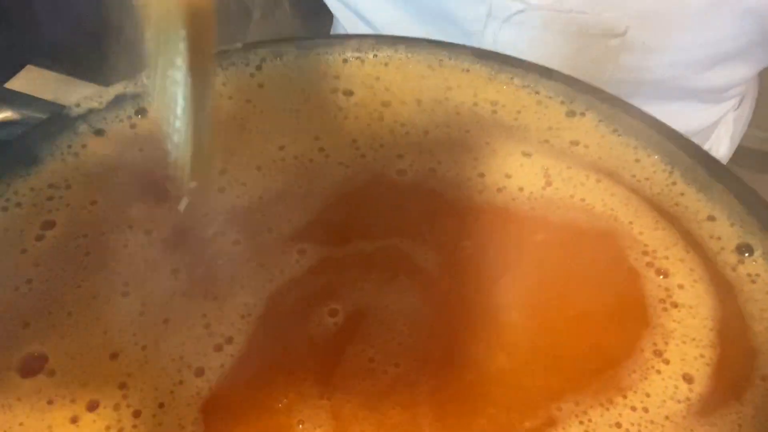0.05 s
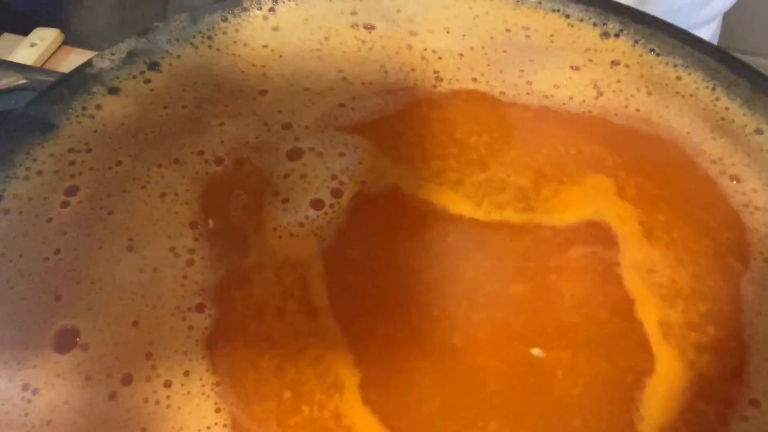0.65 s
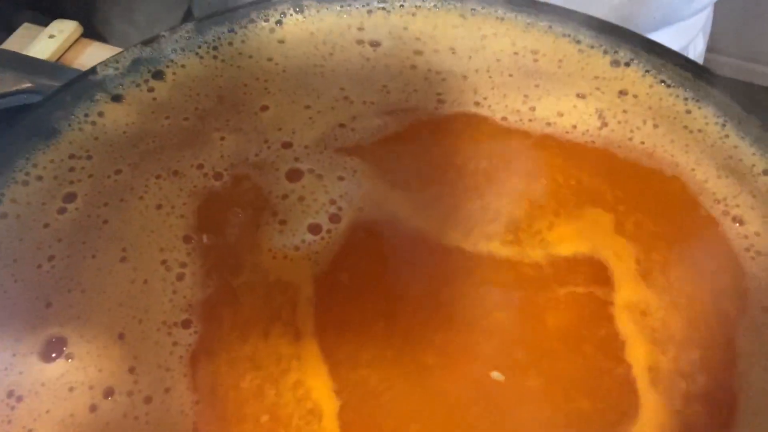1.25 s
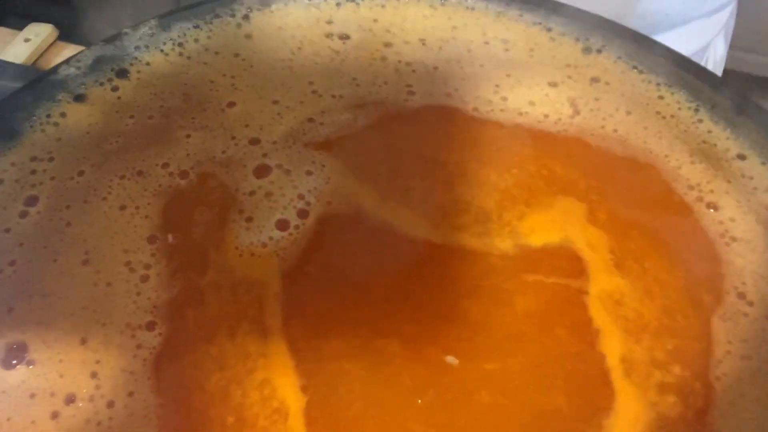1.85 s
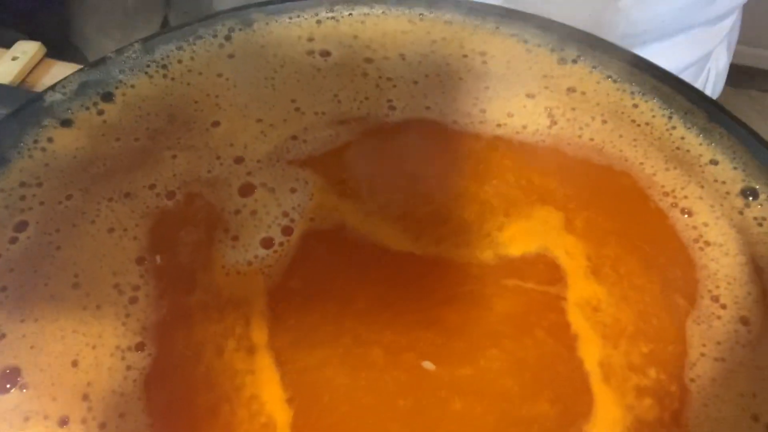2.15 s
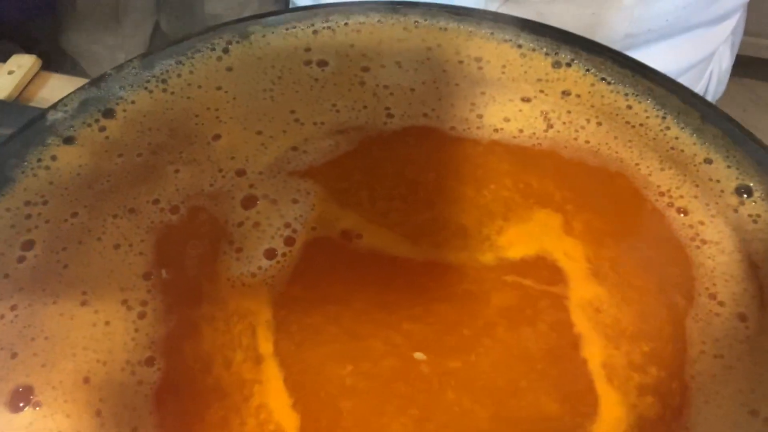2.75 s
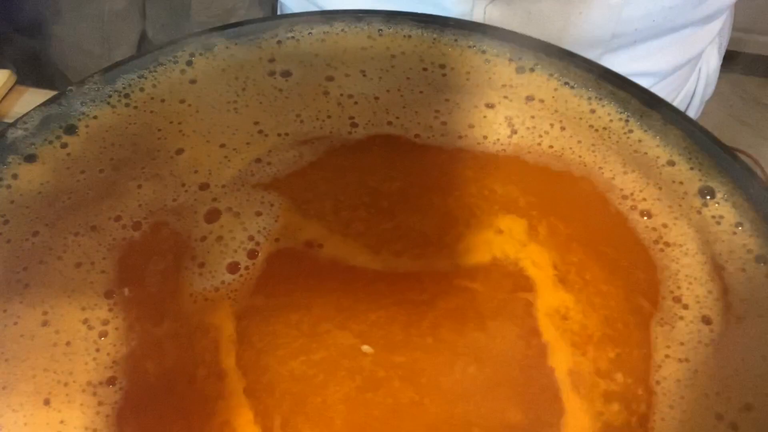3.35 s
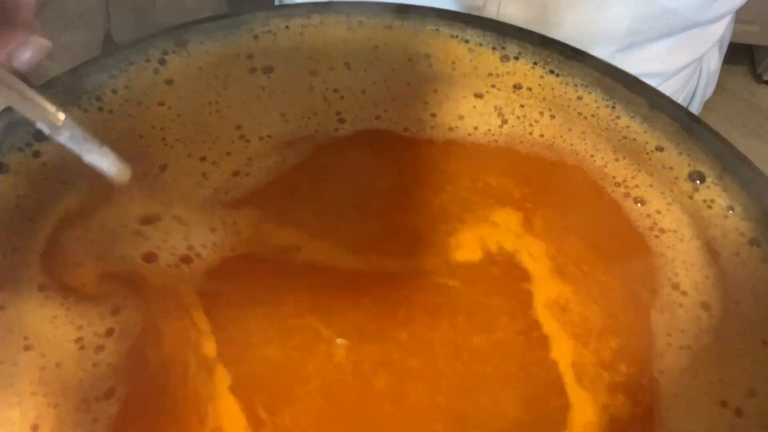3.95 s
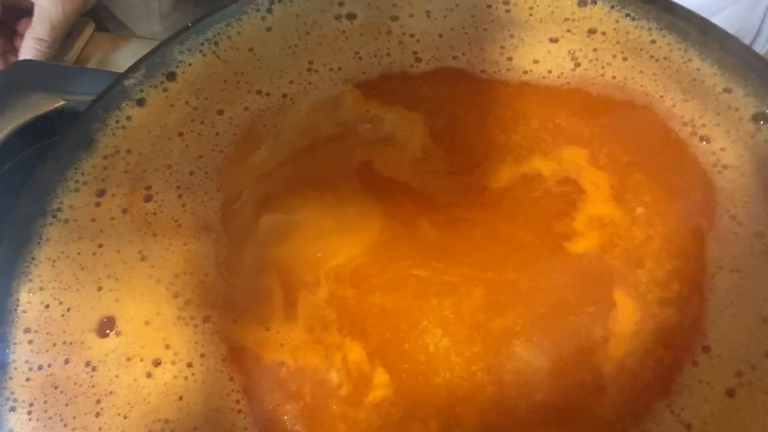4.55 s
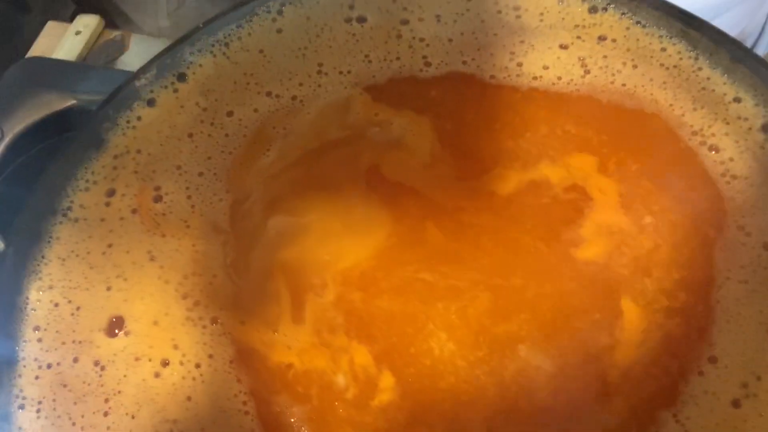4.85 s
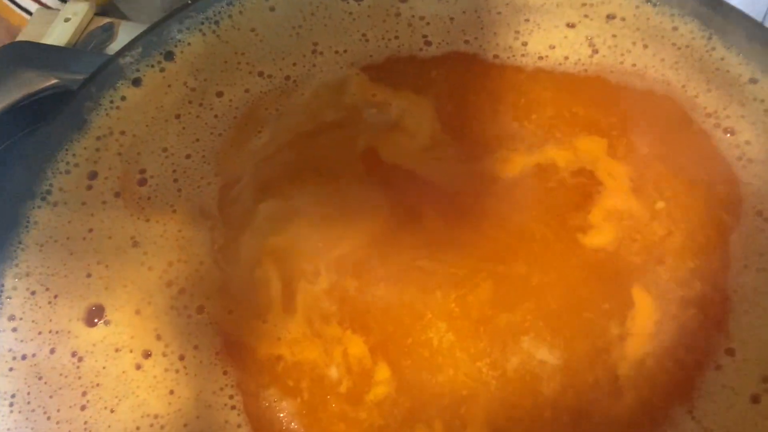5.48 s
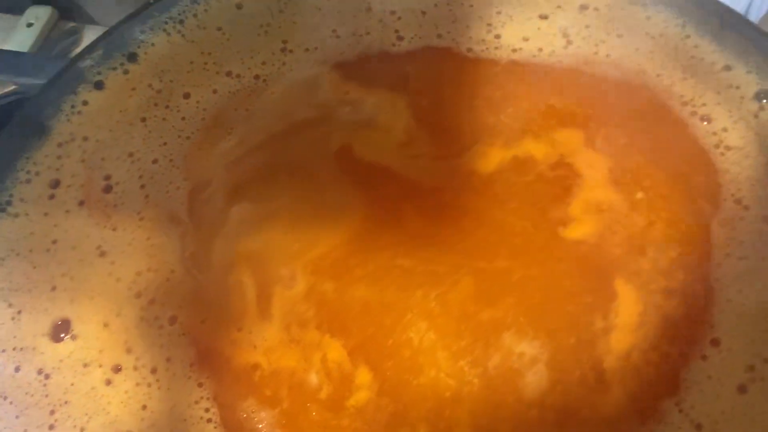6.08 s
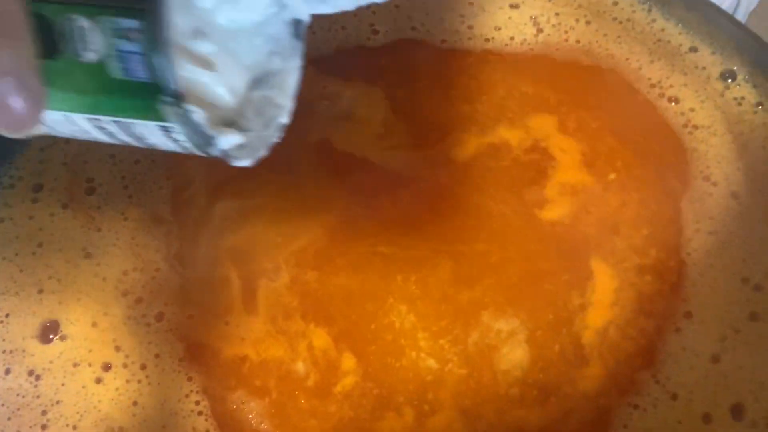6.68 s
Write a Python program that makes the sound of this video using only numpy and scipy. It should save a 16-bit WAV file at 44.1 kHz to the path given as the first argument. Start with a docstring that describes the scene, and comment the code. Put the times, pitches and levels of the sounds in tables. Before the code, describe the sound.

A spoon knocks and clinks on a full pot of soup, with utensils clattering on a wooden worktop over a low stove rumble.

```python
"""A spoon knocks on a full pot of thick soup: a short, damped tock, heard from just above the rim.
The stove rumbles underneath, with soft rustles and scrapes. Utensils clatter on a wooden
worktop, whose hollow booms below each knock. Then the rumble swells as the soup is stirred, the
spoon knocks on the pot again, and its steel rings where it meets the rim; a brief high sizzle
follows. The small kitchen gives every blow a short tail."""
import sys
import numpy as np
from scipy import signal
from scipy.fft import rfft, irfft
from scipy.io import wavfile
from scipy.ndimage import uniform_filter1d

SR = 44100
rng = np.random.default_rng(int(sys.argv[2]) if len(sys.argv) > 2 else 0)


def wav_out(sig):
    """Save sig, one row per channel (or a flat mono array), as 16-bit PCM at SR to the path in sys.argv[1]."""
    wavfile.write(sys.argv[1], SR, np.round(np.clip(np.atleast_2d(sig).T, -1, 1) * 32767).astype(np.int16))


N = 296352
T = np.arange(int(.6 * SR)) / SR  # time within one blow [s]

# spoon on the pot: (time [s], strength [dB], tock pitch [Hz], free ring of the wall [dB], click [dB])
POT_TAPS = [(0.0, -25.5, 400, -7, -49.5), (3.6645, -68.5, 604, 8, -56), (4.1215, -38, 430, 6, -56),
            (4.186, -51.5, 424, -4, -80), (4.244, -30.5, 663, 2.5, -58.5), (4.290, -38.5, 486, 3.5, -73),
            (4.4918, -28, 840, 6, -54), (4.664, -33, 574, 5.5, -46.5), (4.8258, -37.5, 610, 5, -49.5),
            (4.857, -33.5, 620, 4.5, -63), (5.035, -67, 556, 0, -89), (6.3036, -27, 722, -6, -41)]
# soft rustles and scrapes, and a brief high sizzle: (time [s], level [dB], fizz over rustle [dB])
RUSTLES_AND_SIZZLE = [(.11, -72, -4), (.2, -69, -4), (.3, -68.5, -24), (1.388, -61, -8.5),
                      (1.45, -66.5, -11), (1.54, -70, -9), (1.87, -66, -26), (2.865, -67.5, -21),
                      (3.86, -69, -31), (4.125, -66, -12), (4.265, -64.5, -14), (5.19, -91.5, 27),
                      (5.27, -69, -0.5), (6.455, -62, -19.5)]
# utensils on the worktop: (time [s], strength [dB], boom [dB], hardness as click over body [dB])
WORKTOP_KNOCKS = [(.196, -66, -65.5, -3), (.5302, -20.5, -18, -20.5), (.574, -50, -52, -11),
                  (.604, -47, -43, -13), (.629, -45.5, -43, -4), (.713, -57.5, -59, -4.5),
                  (0.807, -51.5, -46, -10), (0.893, -51.5, -41, -3.5), (.907, -50, -36.5, -9),
                  (.968, -40, -46, -26), (0.9762, -32, -32, -34), (1.083, -58.5, -44.5, -2.5),
                  (1.647, -62.5, -53.5, -5), (1.68, -55.5, -52, -10.5), (2.025, -60, -60.5, -6),
                  (2.097, -44.5, -42.5, -4.5), (2.122, -38, -36.5, -7.5), (2.132, -31.5, -35.5, -16.5),
                  (2.2011, -27.5, -31.5, -17.5), (2.2093, -31.5, -35.5, -22), (2.439, -50.5, -44.5, -7.5),
                  (2.466, -44, -40.5, -19), (2.58, -50, -49, -12), (2.611, -50.5, -47, -40),
                  (5.365, -65, -50.5, -14), (5.409, -68, -49.5, -17)]
# steel on the rim: (time [s], level [dB], brightest pitch [Hz], sharpness [Q], wash over ring [dB])
RIM_CLINKS = [(4.49, -48.5, 5460, 1.3, 15.5), (4.662, -31.5, 7200, 1.1, -8), (4.8268, -37, 8500, 0.46, -22),
              (4.857, -39.5, 5000, 1.7, -12.5)]

# modes of the pot wall and of the board: (frequency [Hz], level [dB], t60 [s])
POT_MODES = [(325, -9, 0.23), (390, 0.5, 0.18), (465, 1.5, 0.39), (593, 3, 0.17), (672.5, 4.5, 0.22),
             (797, -1, 0.12), (888, -5, 0.17), (1156, -6.5, 0.12), (1211.5, -3.5, 0.19),
             (1564, -10.5, 0.21), (1604, -10, .16), (1866, -10, .17), (1990, -9, 0.18), (2360, -5, .14)]
WORKTOP_MODES = [(318, -14, 0.69), (434, 3, 0.2), (560, -3, 0.16), (631.5, 0, 0.42), (719, 0, 0.21),
                 (780, -4.5, 0.24), (1007, -6.5, 0.19), (1126, -22, 0.82), (1276, -18.5, 0.15),
                 (1615, -24, 0.33)]
# partials of the spoon: (frequency [Hz]), and for each one (level [dB], t60 [s])
SPOON_PARTIALS_HZ = [2584, 2977, 3832, 4694, 5748, 6289, 6744, 7277, 8250, 10427, 10747, 11367, 12125,
                     14170]
SPOON_DECAYS = [(-6, 0.26), (-10, 0.21), (-16, 0.38), (3.5, 0.19), (-5, 0.26), (-7, 0.24), (-20.5, .24),
                (5.5, 0.13), (-9, .09), (-10, 0.15), (-4.5, 0.16), (-2, 0.094), (-5, 0.12), (-11, .11)]

# noise colours: (frequency [Hz], level [dB])
POT_SPECTRUM = [(100, -38.5), (220, -11.5), (330, 8.5), (450, 7), (750, -3), (950, -9.5), (1300, -6),
                (1700, -17.5), (3500, -25)]  # crowded modes of the full pot
CLACK_SPECTRUM = [(700, -21), (1400, 0.5), (2300, -1.5), (3000, -11.5), (5000, -24), (9000, -43.5)]  # midrange bite of a blow
CLICK_SPECTRUM = [(1500, -23), (3200, 6.5), (5000, -1), (7500, 1), (9100, -16), (11000, 0), (13000, -3.5),
                  (16000, -25.5)]  # bright edge of the contact
THUD_SPECTRUM = [(30, -30), (55, 2), (75, -4.5), (110, 1.5), (150, 3.5), (200, -21.5), (400, -48.5)]  # bass weight of a blow
RUMBLE_SPECTRUM = [(20, -22.5), (35, -8), (52, 2), (69, 6.5), (90, 0.5), (140, -6.5), (170, -20.5),
                   (215, -19.5), (270, -26.5), (400, -62.5)]  # stove under the pot
AIR_SPECTRUM = [(100, -10.5), (160, -4), (270, -10.5), (370, -5), (480, -18), (680, -18.5), (1000, -30.5),
                (1600, -36), (2200, -36), (2800, -34), (3800, -43), (7700, -44.5), (9200, -56.5),
                (10500, -43.5), (13500, -48.5), (15000, -60)]  # room tone
RUSTLE_SPECTRUM = [(500, 14.5), (1300, 4), (3500, 0.5), (7000, -8), (9000, -21), (12000, -44), (15000, -64)]  # soft body of a rustle
FIZZ_SPECTRUM = [(4000, -23), (8000, -7), (10500, -1), (12500, 12.5), (14000, -4), (16000, 8)]  # high, sizzling top end
WOOD_SPECTRUM = [(150, -38), (250, 1), (400, 0.5), (550, 0), (780, 1), (1000, -8.5), (1350, -3),
                 (1800, -22.5), (3000, -45)]  # crowded modes of the board


def amp(db):
    return 10 ** (np.asarray(db) / 20)


def unit_rms(x):
    return x / np.sqrt(np.mean(x ** 2) + 1e-20)


def at_level(x, db):
    """Sets the level of the first thirtieth of a second of a blow."""
    return amp(db) * x / np.sqrt(np.mean(x[..., :SR // 30] ** 2) + 1e-20)


def add(mix, s, sound):
    part = mix[:, max(round(s * SR), 0):][:, :sound.shape[-1]]
    part += sound[..., :part.shape[1]]


def panned(x, db):
    """Sets left over right in dB: negative leans right."""
    return x * amp([[db / 2], [-db / 2]])


def left_early(x, lead_s):
    """Sound from the side reaches the left channel just before the right."""
    turn = np.pi * np.fft.rfftfreq(N, 1 / SR) * lead_s * np.array([[1], [-1]])
    return irfft(rfft(x) * np.exp(1j * turn), N)


def noise(spectrum, size, same, tilt_db=0):
    """Coloured stereo noise, correlated by `same` and tilted by `tilt_db` per octave."""
    hz = np.fft.rfftfreq(size, 1 / SR) + 1
    points_hz, db = np.transpose(spectrum)
    colour_db = np.interp(np.log(hz), np.log(points_hz), db, left=db[0] - 18, right=db[-1] - 14)
    gain = amp(colour_db + tilt_db * np.log2(hz / points_hz[0]))
    left, other = irfft(gain * np.exp(2j * np.pi * rng.random((2, len(hz)))), size)
    return unit_rms(np.array([left, same * left + np.sqrt(1 - same ** 2) * other]))


def decay(t60):
    return np.exp(-np.log(1000) * T / t60)


def attack(rise):
    return 1 - np.exp(-(T / rise) ** 2)


def burst(spectrum, rise, t60, room_db, room_t60, same, tilt_db=0):
    """Crowded modes die away as noise; the kitchen answers with a diffuse tail. Times in seconds."""
    direct = noise(spectrum, len(T), same, tilt_db) * attack(rise) * decay(t60)
    tail = noise(spectrum, len(T), same * .5, tilt_db) * attack(rise + .0011) * decay(room_t60)
    return at_level(direct + amp(room_db) * tail, 0)


def reflected(x, strength):
    """Nearby surfaces return a few echoes within milliseconds, which comb the sound."""
    out = x.copy()
    for delay, sign in zip(rng.uniform(.0006, .005, size=4), rng.choice([-1, 1], size=4)):
        add(out, delay, sign * strength * x)
    return out


def ring(modes, rise, spread, uneven_db):
    """Damped sines, excited unevenly by each blow; every mode has its own phase left and right."""
    out = np.zeros((2, len(T)))
    for hz, db, t60 in modes:
        start, apart, weight = rng.random(3)
        phase = 2 * np.pi * start + spread * apart * np.array([[1], [-1]])
        out += amp(db + uneven_db * (2 * weight - 1)) * decay(t60) * np.sin(2 * np.pi * hz * T + phase)
    return at_level(out * attack(rise), 0)


def favour(x, hz, q):
    """The place and hardness of a contact favour one range of modes."""
    return signal.lfilter(*signal.iirpeak(np.clip(hz, 100, SR / 3), max(q, .5), SR), x)


def pot_taps():
    """A tick and a short hollow tock. A free wall rings and clacks; a damped one thuds instead."""
    out = np.zeros((2, N))
    for s, db, tock_hz, ring_db, click_db in POT_TAPS:
        wall = burst(POT_SPECTRUM, rise=.00028, t60=.023, room_db=-16, room_t60=.2, same=.48)
        wall = favour(reflected(wall, strength=.22), tock_hz, q=.69)
        kitchen = burst(POT_SPECTRUM, rise=.0024, t60=.3, room_db=-11.5, room_t60=.11, same=.25)
        # the first few swings of the struck patch of wall
        tock = attack(.002) * decay(.012) * np.sin(2 * np.pi * tock_hz * T)
        # the freer the wall, the shorter and higher its ring
        modes = np.array(POT_MODES) * [1, 1, 2 ** (-.0779 * ring_db)]
        ring_hz = 510 * 2 ** (.2 * ring_db)
        ringing = ring(modes, rise=.0015, spread=.99, uneven_db=8) + amp(-6) * kitchen
        ringing = favour(ringing, ring_hz, q=.9)
        body = at_level(tock, -4) + at_level(wall, -3) + at_level(ringing, ring_db)
        clack = burst(CLACK_SPECTRUM, rise=.00023, t60=.034, room_db=-20, room_t60=.42, same=.1)
        clack = reflected(clack, strength=.32)
        click = burst(CLICK_SPECTRUM, rise=.00027, t60=.012, room_db=-22.5, room_t60=.13, same=.3,
                      tilt_db=-2.5)
        thud = burst(THUD_SPECTRUM, rise=.006, t60=.15, room_db=-12, room_t60=.33, same=.6)
        lows = at_level(thud, db - ring_db - 25)
        mids = at_level(body, db) + at_level(clack, db + ring_db - 19)
        add(out, s, lows + panned(mids, db=-8) + panned(at_level(click, click_db), db=-2))
    return left_early(out, lead_s=.00016)


def stove():
    """A low flutter under the pot swells once as the soup is stirred, then settles, over room tone."""
    start_s, rise_s, peak_db, settle_db_per_s = 4.1, .5, 14, 5.5
    t = np.arange(N) / SR - start_s
    swell_db = peak_db * np.clip(t / rise_s, 0, 1) - settle_db_per_s * np.maximum(t - rise_s, 0)
    rumble = amp(-57 + swell_db) * noise(RUMBLE_SPECTRUM, N, same=.69)
    air = amp(-64) * noise(AIR_SPECTRUM, N, same=.033)
    return rumble + panned(air, db=-6)


def rustles_and_sizzle():
    """Grainy swells of noise: soft rustles and scrapes, and a brief high sizzle where fizz is strong."""
    out = np.zeros((2, N))
    size = int(.11 * SR)
    swell = np.sin(np.pi * np.arange(size) / size)
    for s, db, fizz_db in RUSTLES_AND_SIZZLE:
        rustle = noise(RUSTLE_SPECTRUM, size, same=.065)
        fizz = amp(fizz_db) * noise(FIZZ_SPECTRUM, size, same=.13)
        grain_db = 2.7 * unit_rms(uniform_filter1d(rng.standard_normal(size), size=130))
        add(out, s, amp(db + grain_db) * (rustle + fizz) * swell)
    return panned(out, db=-4)


def worktop_knocks():
    """A click, the board's body, then the hollow beneath. Strength drives bass, hardness treble."""
    out = np.zeros((2, N))
    hard_knock_db = -20  # the thud falls away as knocks get softer than this
    for s, db, boom_db, hard_db in WORKTOP_KNOCKS:
        thud = burst(THUD_SPECTRUM, rise=.021, t60=.18, room_db=-6, room_t60=.64, same=.51)
        board = burst(WOOD_SPECTRUM, rise=.0013, t60=.14, room_db=-6.5, room_t60=.38, same=.5)
        board = reflected(board, strength=.54)
        body = board + amp(-5.5) * ring(WORKTOP_MODES, rise=.0018, spread=.61, uneven_db=2.5)
        clack = burst(CLACK_SPECTRUM, rise=.001, t60=.069, room_db=-11, room_t60=.38, same=.3)
        clack = at_level(reflected(clack, strength=.51), db - 5.5 + .44 * hard_db)
        click = burst(CLICK_SPECTRUM, rise=.00043, t60=.013, room_db=-15.5, room_t60=.21, same=.15,
                      tilt_db=-1 + .16 * hard_db)
        click = at_level(reflected(click, strength=.14), db + hard_db)
        thud_db = -31.5 + .85 * (db - hard_knock_db)
        lows = at_level(thud, thud_db) + amp(boom_db) * hollow_boom()
        add(out, s, lows + panned(at_level(body, db) + clack + click, db=-5))
    return left_early(out, lead_s=.00022)


def hollow_boom():
    """The cavity under the worktop blooms quickly and leaves a faint hum."""
    centre_hz, swell_s = 210.1, .021
    bloom = (T / swell_s) ** 2
    envelope = bloom * np.exp(1 - bloom) + amp(-12.5) * attack(swell_s) * decay(.49)
    hz = centre_hz * (1 + .053 * rng.uniform(-1, 1))
    return np.sqrt(2) * envelope * np.sin(2 * np.pi * (hz * T + rng.random()))


def spoon_clinks():
    """Thin steel rings in clear partials over a short bright wash; their own echoes make them waver."""
    out = np.zeros((2, N))
    partials = np.column_stack([SPOON_PARTIALS_HZ, SPOON_DECAYS])
    kitchen = rng.standard_normal((2, len(T))) * attack(.02) * decay(.14)
    kitchen /= np.linalg.norm(kitchen[0])
    for s, db, bright_hz, q, wash_db in RIM_CLINKS:
        wash = burst(CLICK_SPECTRUM, rise=.00065, t60=.16, room_db=-12, room_t60=.39, same=.16)
        steel = ring(partials, rise=.00098, spread=1.3, uneven_db=.5)
        echoes = .3 * signal.fftconvolve(steel, kitchen, axes=1)[:, :len(T)]
        clink = steel + echoes + amp(wash_db) * reflected(wash, strength=.47)
        boom = amp(db - 10.5) * hollow_boom()  # a blow on the rim also shakes the worktop
        add(out, s, at_level(favour(clink, bright_hz, q), db) + boom)
    return panned(out, db=-2.5)


def scene():
    """Knocks, taps and clinks up front; rustles, sizzle and stove behind."""
    return worktop_knocks() + pot_taps() + spoon_clinks() + rustles_and_sizzle() + stove()


def record(dry):
    """A steep low-pass takes off the very top."""
    edge_hz = 15000
    low_pass = signal.firwin(511, edge_hz, window=("kaiser", 9), fs=SR)
    return signal.oaconvolve(dry, low_pass[None], "same")


dry = scene()
out = record(dry)
wav_out(out)
```